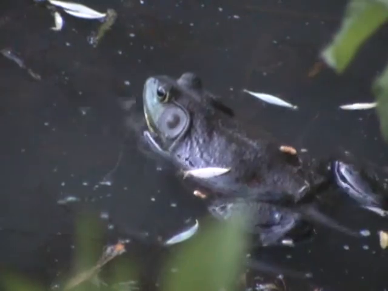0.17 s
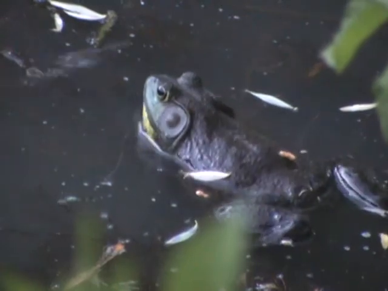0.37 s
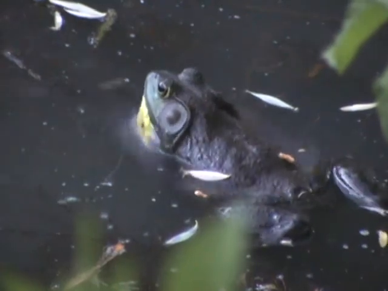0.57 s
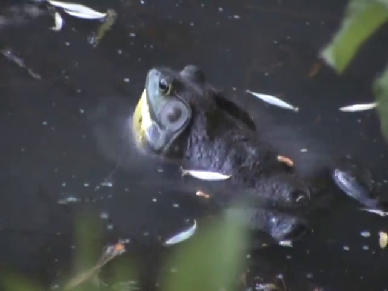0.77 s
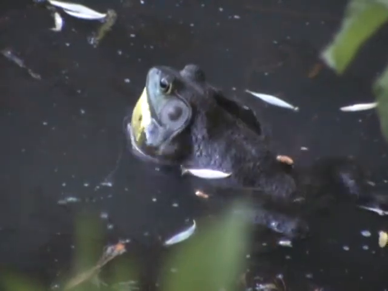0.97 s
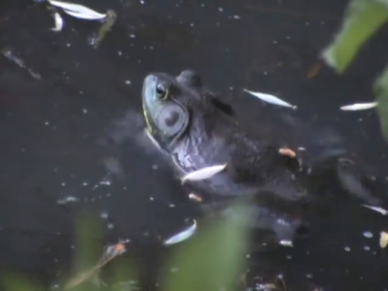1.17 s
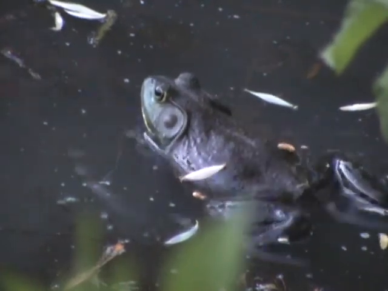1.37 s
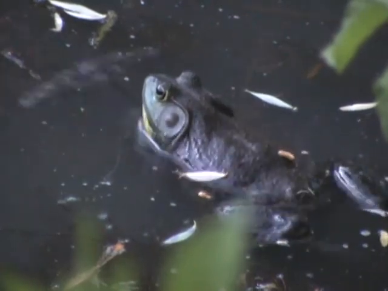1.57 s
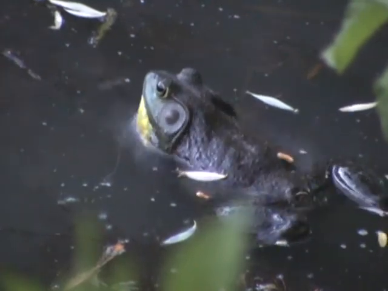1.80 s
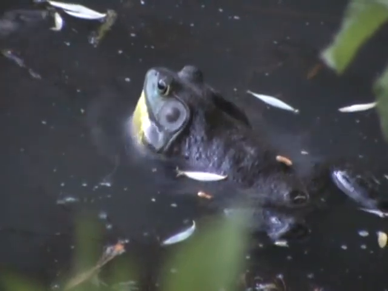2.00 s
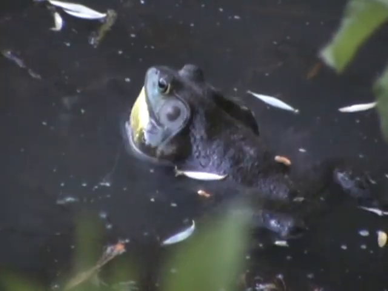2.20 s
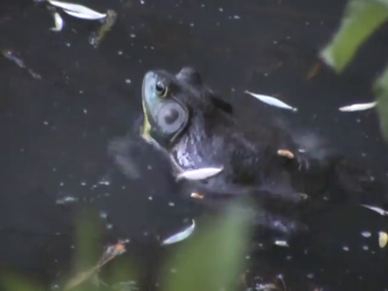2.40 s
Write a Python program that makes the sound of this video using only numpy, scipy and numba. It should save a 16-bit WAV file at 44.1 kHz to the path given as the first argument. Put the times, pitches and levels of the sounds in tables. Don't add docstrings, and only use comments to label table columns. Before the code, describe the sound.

A bullfrog close to a small stereo microphone gives two deep, swelling, raspy bellows of under a second each, with a short gap; light water drips, faint bird whistles and a soft low rumble surround it.

```python
import sys
import numpy as np
from scipy import signal
from scipy.fft import rfft, irfft, next_fast_len
from scipy.io import wavfile
from scipy.ndimage import uniform_filter1d
from numba import njit

SR = 44100
rng = np.random.default_rng(int(sys.argv[2]) if len(sys.argv) > 2 else 0)


def field_ratio(decibels):
    return 10 ** (np.asarray(decibels, dtype=float) / 20)


def master(y):
    cut = np.clip(np.atleast_2d(y).T, -1, 1)
    pcm = np.round(cut * 32767)
    wavfile.write(sys.argv[1], SR, pcm.astype(np.int16))


N = 108045

# time in seconds, cycle rate in Hz, sac hum in dB, cord slap in dB, roughness from 0 to 1.
BELLOWS = [
    [(.05, 97.8, -67, -95, .3), (.075, 98.54, -44.5, -58, .3), (.16, 98.75, -40, -38, 0.33),
     (.29, 97.76, -32, -27.5, .45), (.44, 97.42, -27, -26, 0.59), (.53, 101.1, -24, -24.5, 0.29),
     (.8, 104.6, -22.5, -25.5, 0.22), (.9, 97.28, -30.5, -34.5, 0.17), (.95, 94.46, -51.5, -72, 0.2)],
    [(1.32, 98.4, -65, -70, 0.2), (1.345, 99.36, -39.5, -52, .3), (1.45, 97.75, -38.5, -33.5, 0.28),
     (1.53, 96.43, -31, -27.5, 0.43), (1.66, 96.85, -24.5, -26, 0.41), (1.76, 101, -26, -25, 0.42),
     (2.08, 104.7, -22, -25, 0.11), (2.18, 95.9, -30.5, -35, 0.2), (2.23, 93.2, -47.5, -67, 0.2)],
]
# start in seconds, hum drop in dB, slap drop in dB,
# recovery in seconds, slip of the cycle in turns.
CATCHES = [
    (.306, 9, 3.5, 0.042, 0.16),
    (0.447, 7, 3, 0.041, .2),
    (.587, 6.5, 2, 0.02, 0.24),
    (1.531, 7.5, 2.5, 0.049, .15),
    (1.663, 10, 2, .04, .2),
    (1.818, 2.5, 2.5, 0.017, 0.1001),
    (1.93, 12.5, 6.5, 0.014, 0.26),
]
# multiple of the cycle rate, level in dB when swollen,
# loss in dB while the sac is slack.
SAC_PARTIALS = [(2, 0, 2), (3, -1, 11), (4, -18.5, 1), (5, -22, -1), (6, -24, -2)]
# centre in Hz, width in Hz, level in dB at full effort,
# extra loss in dB per dB below full effort.
THROAT_RESONANCES = [(547, 117, -9, 0.95), (945, 190, -7, 0.12), (1162, 82, 0, -0.15),
                     (1480, 365, 1.5, 1.28), (1856, 339, 0.5, 2.62), (2154, 428, -3.5, 2.63),
                     (3078, 335, -14.5, 2.3), (3410, 450, -13.5, 4.1), (6638, 2000, -39, 6.3),
                     (10200, 1100, -48.5, 1.6)]
# start in seconds, end in seconds, starting pitch in Hz, final pitch in Hz, level in dB.
EARDRUM_SKINS = [(.23, .3, 5200, 4150, -59), (.3, .44, 4250, 3950, -60), (.44, .62, 5900, 4900, -52),
                 (.45, .53, 4900, 4300, -54), (.6, .84, 4900, 4520, -47), (.55, .84, 6100, 5500, -55),
                 (.36, .45, 5050, 4800, -59), (.49, .59, 3700, 2900, -50), (1.6, 1.76, 5100, 4600, -55),
                 (1.56, 1.68, 4300, 4000, -58), (1.63, 1.94, 6000, 4800, -51),
                 (1.94, 2.12, 4900, 4500, -46), (1.85, 2.12, 6100, 5550, -55)]
SLAP_AND_RETURNS_DB = [0, -9, -10]
# centre in seconds, length in seconds, top pitch in Hz, level in dB.
BIRD_NOTES = [
    (0.201, 0.067, 4000, -57),
    (2.218, .05, 2570, -55),
    (2.332, 0.056, 2704, -52.5),
    (2.44, 0.061, 2710, -52),
]
# start in seconds, ring in Hz, level in dB.
WATER_DROPS = [(1.092, 8000, -63.5), (1.102, 9300, -59.5), (1.124, 4600, -51), (1.131, 4970, -58),
               (1.131, 7300, -61), (1.315, 7500, -56), (1.333, 3000, -38.5), (1.333, 4190, -47.5),
               (1.335, 1180, -39), (1.337, 8300, -59), (1.352, 3000, -49), (1.395, 4240, -52),
               (1.4, 6060, -53), (1.4, 8500, -53), (.462, 5330, -47), (0.48, 5650, -40.5),
               (1.615, 5500, -49), (1.682, 4798, -42), (1.812, 6000, -50)]
# frequency in Hz, density in dB per Hz.
AIR_SPECTRUM = [(25, -12), (65, 2), (180, 1.5), (320, -7.5), (500, -17), (1400, -15), (7000, -31.5),
                (15700, -39.5)]
# frequency in Hz, lead of the left in radians.
PORT_LEAD = [(30, .35), (70, .5), (200, 1.0), (600, 1.17), (1100, .9), (2200, .52), (4500, .3), (9000, 0.)]


def level(x, db):
    return x * field_ratio(db) / np.sqrt(np.mean(x ** 2))


@njit
def moving_resonator(x, hz, width):
    y, band_state, low_state = np.empty(len(x)), 0., 0.
    for i in range(len(x)):
        g, k = np.tan(np.pi * hz[i] / SR), width / hz[i]
        v = (band_state + g * (x[i] - low_state)) / (1 + g * (g + k))
        band_state = 2 * v - band_state
        low_state = low_state + 2 * g * v
        y[i] = k * v
    return y


def band(x, hz, width):
    return moving_resonator(x, hz + np.zeros(len(x)), 1. * width)


def walk(rate):
    k = int(SR / rate)
    held = np.repeat(rng.standard_normal(N // k + 1), k)
    return 1.3 * uniform_filter1d(uniform_filter1d(held, k), k)[:N]


def clicks(at_s, size):
    p = np.clip(at_s * SR, 0, N - 2)
    i = p.astype(int)
    return np.bincount(i, size * (1 - p + i), N) + np.bincount(i + 1, size * (p - i), N)


def on_log_axis(hz, table):
    freqs, values = np.transpose(table)
    return np.interp(np.log(hz), np.log(freqs), values)


def air():
    both, apart = 0, 0
    side_db, side_full_hz = -9, 6000
    for hz in 30 * 2 ** np.arange(0, 9.2, .5):
        mid, side = (level(band(band(rng.standard_normal(N), hz, hz / 2), hz, hz / 2), 0) for _ in range(2))
        db = on_log_axis(hz, AIR_SPECTRUM) + 10 * np.log10(hz) + 0.17 * walk(8.05)
        both = both + field_ratio(db) * mid
        apart = apart + field_ratio(db + side_db) * min(hz / side_full_hz, 1) ** .5 * side
    gain = field_ratio(-47) / np.std(both)
    hum_hz, hum_width_hz = 121.7, 14
    hum = band(band(rng.standard_normal(N), hum_hz, hum_width_hz), hum_hz, hum_width_hz)
    return gain * both + level(hum, -57), gain * apart


def vocal_cycle(t):
    rows = np.concatenate(BELLOWS)
    hz, hum_db, slap_db, rough = (np.interp(t, rows[:, 0], rows[:, k]) for k in range(1, 5))
    turns = np.cumsum(hz * (1 + .006 * walk(30))) / SR
    onset_s, slip_s = 0.0088, 0.0155
    for at, hum_drop_db, slap_drop_db, back_s, slip in CATCHES:
        on, glide = (np.sin(np.pi / 2 * np.clip((t - at) / s, 0, 1)) ** 2 for s in (onset_s, slip_s))
        dip = on * np.exp(-(np.maximum(t - at, 0) / back_s) ** 2)
        hum_db = hum_db - hum_drop_db * dip
        slap_db = slap_db - slap_drop_db * dip
        rough = rough + 0.45 * dip
        turns = turns + slip * glide
    stretch = (hz / 102) ** .5
    return turns, hum_db, slap_db, rough, stretch


def sac_hum(t, turns, hum_db):
    swell_s, lag_turns = 0.47, .33
    slack = 0
    for call in BELLOWS:
        start, end = call[0][0], call[-1][0]
        slack = slack + (t >= start) * (t < end) * np.clip(1 - (t - start) / swell_s, 0, 1)
    hum = 0
    for k, db, slack_db in SAC_PARTIALS:
        partial_db = hum_db + db - slack_db * slack + 2.86 * walk(40.12)
        hum = hum + np.sqrt(2) * field_ratio(partial_db) * np.cos(2 * np.pi * k * (turns - lag_turns))
    return hum


def cord_slaps(t, turns, rough, stretch):
    return_s, jitter_s, scatter_db = .0034, .00028, 4.
    cycles = np.arange(int(N / SR * 120))
    chance = rng.standard_normal((len(cycles), 3, 2))
    first = np.interp(cycles, turns, t)[:, None]
    at = first + np.arange(3) * return_s / np.interp(first, t, stretch)
    r = np.clip(np.interp(at, t, rough), 0, 1)
    size = field_ratio(np.array(SLAP_AND_RETURNS_DB) + scatter_db * r * chance[..., 0]) * (at < t[-1])
    return clicks((at + jitter_s * r * chance[..., 1]).ravel(), size.ravel())


def breath_puffs(slaps):
    fade = np.exp(-1 / (.0008 * SR))
    gate = signal.lfilter([1], [1, -fade], slaps)
    return gate * rng.standard_normal(N) * np.sqrt(1 - fade ** 2)


def throat_rasp(slaps, puff, slap_db, rough, stretch):
    full_effort_db, puff_above_hz = -25.5, 5000
    drive = slaps + field_ratio(-8) * rough * puff
    rasp = 0
    for k, (hz, width, db, tilt) in enumerate(THROAT_RESONANCES):
        source = drive if hz < puff_above_hz else puff
        wavering = band(source, hz * stretch * (1 + 0.013 * walk(12.27)), width)
        ring = level(band(wavering, hz * stretch, 2.56 * width), -5.5)
        sign = (-1) ** (k + 1)
        rasp = rasp + sign * field_ratio(db + tilt * (slap_db - full_effort_db)) * ring
    return field_ratio(slap_db) * rasp


def eardrum_skins(t, puff):
    width_hz = 150
    shake = level(puff, 0) + .2 * rng.standard_normal(N)
    skins = 0
    for start, end, hz0, hz1, db in EARDRUM_SKINS:
        u = np.clip((t - start) / (end - start), 0, 1)
        hz = hz1 + (hz0 - hz1) * (1 - u) ** 1.4
        ring = level(band(band(shake, hz, width_hz), hz, 3 * width_hz), db)
        skins = skins + np.sin(np.pi * u) ** 0.38 * ring
    return skins


def frog(t):
    turns, hum_db, slap_db, rough, stretch = vocal_cycle(t)
    voiced = sum((t > call[0][0]) & (t < call[-1][0]) for call in BELLOWS)
    hum = sac_hum(t, turns, hum_db)
    slaps = cord_slaps(t, turns, rough, stretch)
    puff = breath_puffs(slaps)
    rasp = throat_rasp(slaps, puff, slap_db, rough, stretch)
    return voiced * (hum + rasp + eardrum_skins(t, puff))


def banks(voice, t):
    decay = rng.standard_normal(32768) * np.exp(-t[:32768] / 0.12)
    tail = band(decay, 1940, 1940)
    return field_ratio(-29.5) * signal.fftconvolve(voice, tail / np.linalg.norm(tail))[:N]


def bird(t):
    out, breath = 0, rng.standard_normal(N)
    for at, length, hz, db in BIRD_NOTES:
        u = np.clip((t - at) / length * 2, -1, 1)
        whistle = band(breath, hz * (1 - .16 * u ** 2), 70)
        out = out + np.cos(u * np.pi / 2) * level(whistle, db)
    return out


def drops(t):
    rise_s, t60_s = 0.0004, 0.013
    out = 0
    for at, hz, db in WATER_DROPS:
        u = np.maximum(t - at, 0)
        envelope = 2 * (1 - np.exp(-u / rise_s)) * field_ratio(-60 * u / t60_s)
        out = out + field_ratio(db) * envelope * np.sin(2 * np.pi * hz * u)
    return out


def ports(x):
    n = next_fast_len(N + 8192)
    f = np.maximum(np.fft.rfftfreq(n, 1 / SR), 1)
    lead = on_log_axis(f, PORT_LEAD)
    left_db = 2.5 / (1 + (f / 6960) ** 4)
    spectrum = rfft(x, n)
    sides = [irfft(spectrum * field_ratio(s * left_db / 2) * np.exp(.5j * s * lead), n)[:N] for s in (1, -1)]
    return np.array(sides)


def scene():
    t = np.arange(N) / SR
    both, apart = air()
    voice = frog(t)
    voice = voice + banks(voice, t)
    return ports(both + voice + bird(t) + drops(t)) + apart * np.array([[1], [-1]])


def band_limit(x):
    return signal.sosfilt(signal.butter(12, 15850, fs=SR, output="sos"), x)


def record(dry):
    low_pass = signal.ellip(8, .2, 70, 15800, fs=SR, output="sos")
    mix = signal.sosfilt(low_pass, dry)
    return band_limit(mix)


dry = scene()
out = record(dry)
master(out)
```